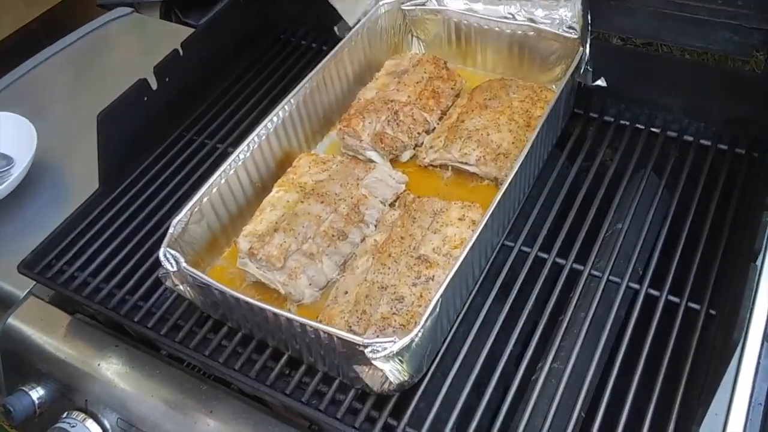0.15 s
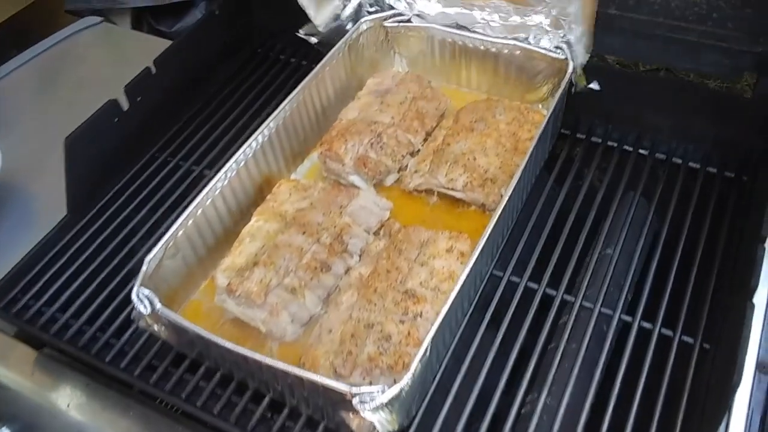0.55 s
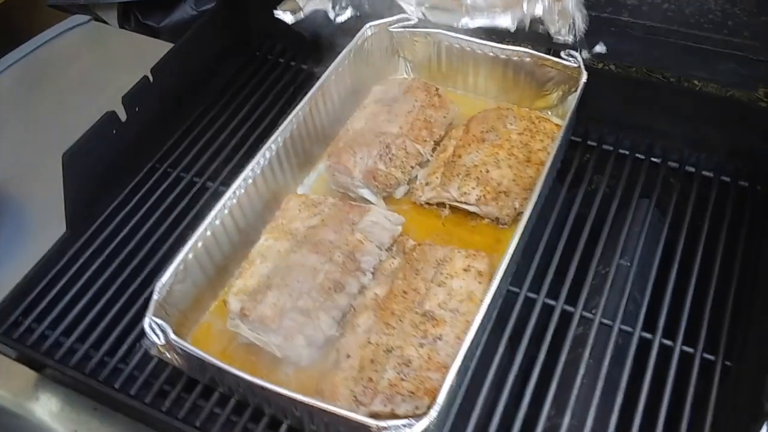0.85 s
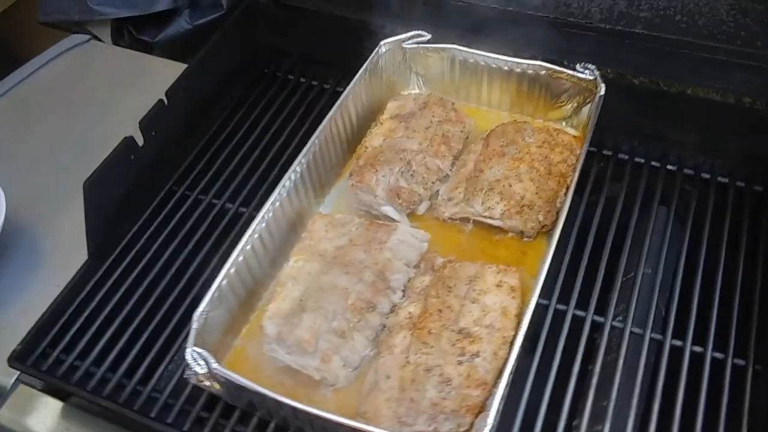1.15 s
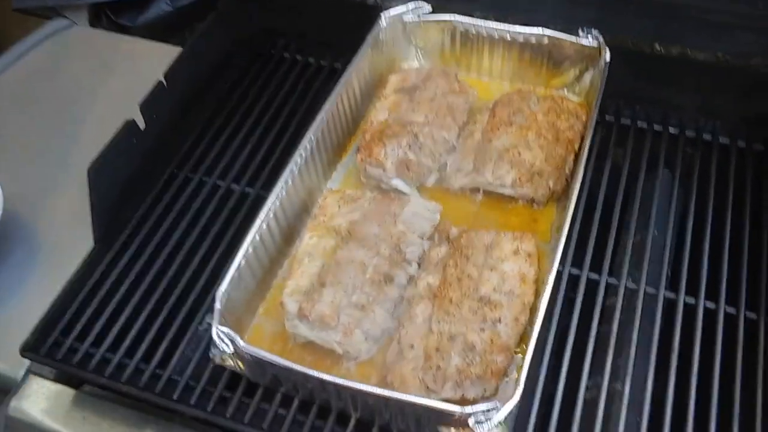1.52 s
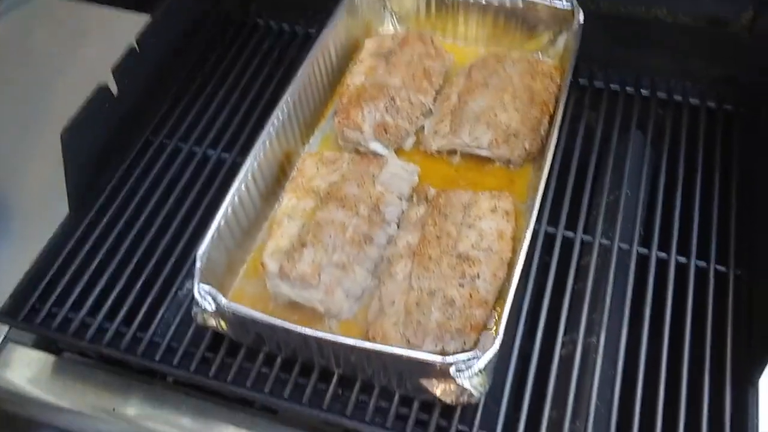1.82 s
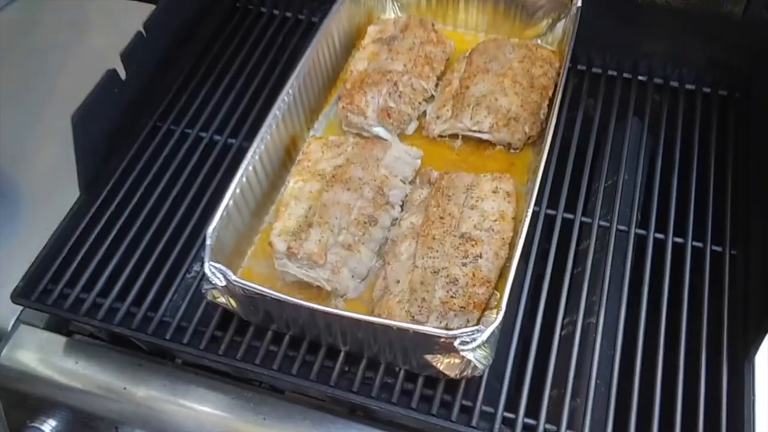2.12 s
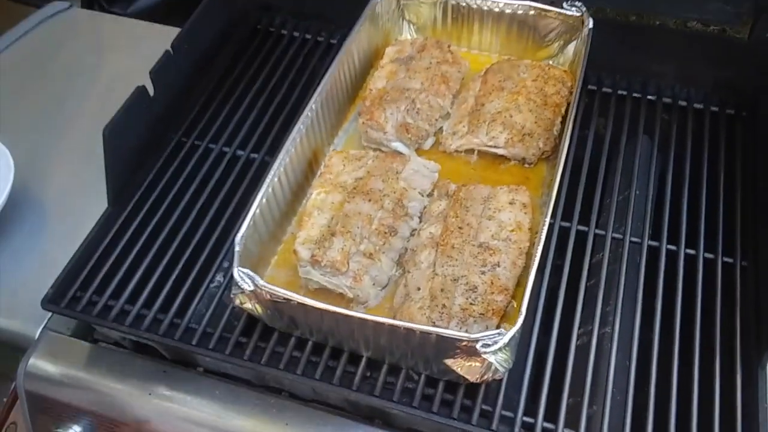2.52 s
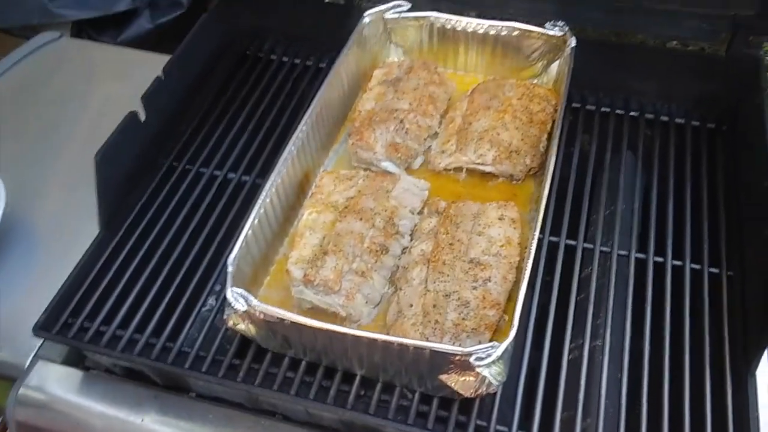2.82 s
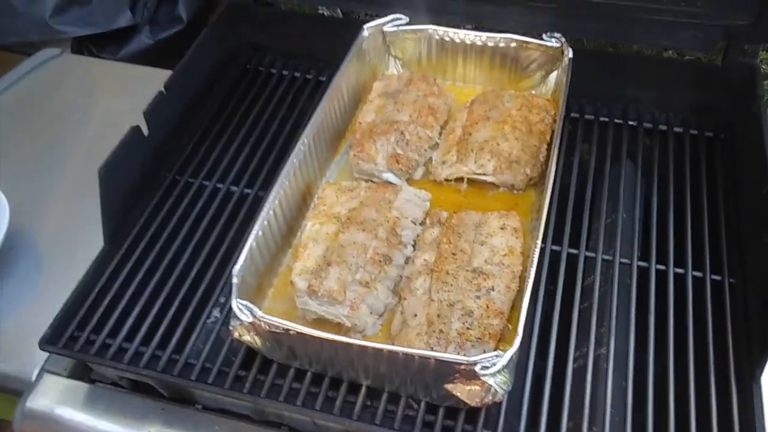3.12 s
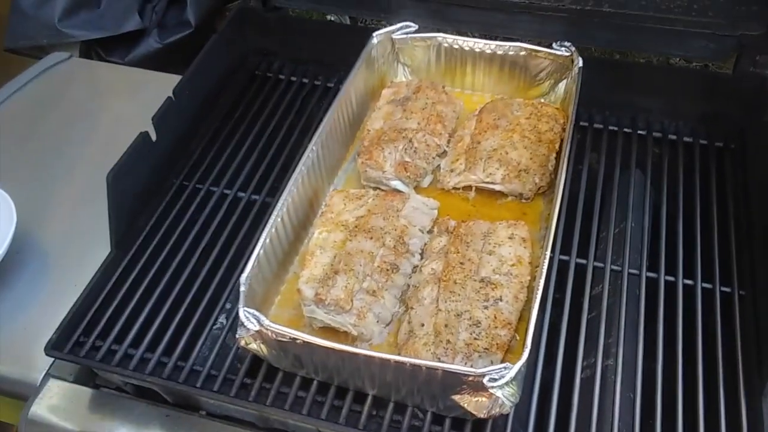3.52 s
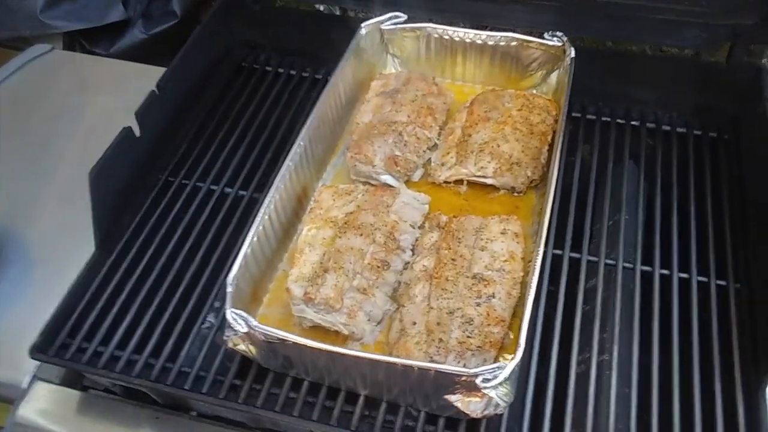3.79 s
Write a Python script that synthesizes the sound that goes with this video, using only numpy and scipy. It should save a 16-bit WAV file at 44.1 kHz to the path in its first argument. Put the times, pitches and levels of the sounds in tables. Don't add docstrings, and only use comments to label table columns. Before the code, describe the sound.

Aluminium foil is tugged and crumpled off a hollow foil tray, very close to a small microphone outdoors; after one second only faint insect hiss, small bird chirps and slight foil rustles remain, with another crinkle at the end.

```python
import sys
import numpy as np
from scipy import signal
from scipy.fft import rfft, irfft, next_fast_len
from scipy.io import wavfile
from scipy.ndimage import uniform_filter1d

SR = 44100
rng = np.random.default_rng(int(sys.argv[2]) if len(sys.argv) > 2 else 0)


def master(y):
    cut = np.clip(np.atleast_2d(y).T, -1, 1)
    pcm = np.round(cut * 32767)
    wavfile.write(sys.argv[1], SR, pcm.astype(np.int16))


def ratio_of_db(decibels):
    return 10 ** (np.asarray(decibels, float) / 20)


N = 174195

# pitch_hz, level_db (per Hz)
TOWN_SPECTRUM = [(30, -12), (55, -2.5), (280, -6), (600, -17), (850, -13), (1150, -19), (2200, -28.5),
                 (3400, -35.5)]
# pitch_hz, level_db (per Hz)
AIR_SPECTRUM = [(2000, -20), (7000, 3.5), (11000, -13), (15500, -20)]
# start_s, level_db, nearest_singers_lift_db, highest_singers_lift_db
CHORUS_SWELL = [(0.0, -29, -5, 0), (.09, -31.5, -3, 2), (0.22, -41, 1, 8), (0.77, -26.5, -15, 0),
                (1.11, -37.5, 1, 0), (1.25, -41.5, -3, -3), (1.42, -44, -1.5, 1.5), (1.7, -39.5, -1.5, 1),
                (1.95, -45, 0, -2.5), (2.15, -41.5, 1, 0.5), (2.34, -38, -4, 0.5), (2.69, -40, 1.5, -2),
                (3.0, -38, 1, 4), (3.3, -37.5, 5, 1), (3.45, -36.5, 3, -6), (3.6, -36, 8.5, -1),
                (3.75, -35, 5, 1.5), (3.95, -36.5, 3.5, 2)]
# pitch_hz, width_hz, level_db
WING_RESONANCES = [(4340, 1530, -7.5), (6520, 2620, -0.5), (8840, 4400, -11.5), (5815, 1700, -1.5)]
# start_s, length_s, start_hz, end_hz, level_db
BIRD_NOTES = [(0.998, .014, 2580, 2540, -43), (0.0, .09, 4350, 4300, -40), (1.13, .035, 2650, 2600, -50),
              (1.04, 0.014, 2550, 2600, -43), (1.213, .03, 2490, 2530, -51),
              (1.433, 0.027, 2750, 2630, -49), (1.47, 0.027, 2680, 2580, -59), (1.56, .03, 2780, 2490, -48),
              (1.44, 0.15, 3350, 3420, -55), (1.51, 0.032, 2700, 2600, -54), (1.355, .03, 2970, 2900, -50),
              (1.9, 0.27, 2650, 2550, -66), (2.77, 0.05, 3450, 3476, -56), (2.64, 0.058, 3900, 3850, -49),
              (2.85, .05, 2850, 2880, -67), (2.222, .025, 4550, 4440, -46), (2.252, .03, 4050, 4300, -48),
              (2.278, 0.036, 4500, 4730, -44.5), (2.66, 0.05, 2420, 2380, -58),
              (2.922, 0.02, 2860, 2640, -49), (3.107, 0.017, 3300, 3150, -57),
              (3.127, 0.024, 3000, 2970, -46), (3.205, 0.061, 2350, 2180, -56),
              (3.0, 0.42, 1316, 1280, -59.5), (3.46, .045, 3000, 3000, -46), (3.51, .05, 2980, 2970, -54),
              (3.59, .1, 2450, 2360, -49), (3.772, 0.028, 1167, 1216, -37.5)]
# start_s, length_s, start_hz, end_hz, level_db
SCOLD_NOTES = [
    (1.73, 0.042, 3620, 3320, -37.5),
    (1.742, 0.0293, 3780, 4270, -37.5),
    (1.76, 0.048, 3110, 3070, -36.5),
    (1.788, 0.03, 2750, 2610, -47),
    (2.14, 0.068, 2390, 2500, -62),
    (2.88, .08, 1780, 1740, -61),
    (1.85, 0.056, 3120, 3010, -49),
]
# start_s, rise_s, hold_s, level_db, release_db_per_s
SHEET_FLUTTERS = [
    (1.0, .03, 0.081, -44.5, 64),
    (1.296, 0.018, 0.041, -51.5, 40),
    (1.588, 0.027, .05, -44.5, 123),
    (1.71, 0.025, 0.11, -47.5, 66),
    (2.201, .006, 0.055, -43.5, 112),
    (2.898, 0.04, .05, -55.5, 80),
    (3.4, .08, .03, -58, 60),
    (3.525, .006, 0.071, -44, 110),
    (3.62, .02, .05, -51, 100),
    (3.771, .003, 0.047, -46.5, 150),
]
# pitch_hz, level_db
FLUTTER_SPECTRUM = [(250, -14), (600, -2), (1000, 3.5), (1600, -1.5), (2600, 1.5), (4300, -0.5), (7000, -5),
                    (12000, -30)]
# start_s, peak_db
TRAY_POPS = [(0.136, -27), (0.213, -24.5), (0.269, -19), (0.32, -22), (0.364, -31), (0.404, -20),
             (0.463, -23.5), (0.547, -22), (0.573, -29.5), (0.666, -25.5), (0.689, -32)]
# pitch_hz, level_db, t60_s
TRAY_MODES = [(398, -6.5, 0.043), (733, -4, 0.075), (855, -4.5, 0.081)]
# start_s, level_db
MIC_BUMPS = [
    (.2875, -24),
    (1.91, -40),
    (1.57, -44),
]
# start_s, rise_s, hold_s, crease_level_db, sheet_rustle_relative_db
FOIL_TUGS = [(-.03, 0.011, 0.02, -34.5, -3), (0.099, 0.022, .012, -34, 1), (0.128, 0.012, .01, -28.5, -0.5),
             (0.189, 0.011, 0.029, -24, -6), (0.24, 0.011, 0.015, -30.5, 1),
             (0.269, 0.038, 0.03, -28.5, -1), (0.329, 0.006, 0.012, -21, -9.5),
             (0.342, .008, 0.022, -22, -13.5), (0.381, 0.0095, 0.019, -26, -0.5),
             (0.4, 0.015, 0.029, -17.5, -10), (0.451, 0.0077, 0.025, -26, -8.5),
             (0.493, .01, 0.032, -28, -0.5), (0.538, 0.006, 0.019, -23.5, -6),
             (0.551, .012, 0.052, -20, -11.5), (0.645, 0.02, 0.033, -30.5, 0.5),
             (0.697, .015, 0.037, -29.5, -2.5), (0.763, 0.006, 0.025, -27.5, -4.5),
             (0.786, .012, 0.038, -26, -7), (0.85, 0.0033, 0.008, -23, -3.5),
             (0.86, .004, 0.011, -25, -6.5), (0.9, .01, 0.041, -34.5, -7),
             (0.944, 0.0037, 0.012, -37.5, 1.5), (1.3162, .001, .018, -41, -7),
             (1.6168, .003, .016, -37.5, -12), (1.637, .004, 0.0074, -43, 0.5),
             (2.205, .003, .008, -57, -3), (3.769, .003, 0.02, -48, 1), (3.82, 0.004, 0.012, -38, 1.5),
             (3.862, 0.0026, 0.013, -40.5, 0.5), (3.876, .01, 0.088, -34.5, -5.5)]
# start_s, peak_db
FOLD_SNAPS = [(0.1231, -17.5), (0.207, -13), (0.3386, -6), (0.41, -5), (0.5396, -12), (0.5694, -7),
              (0.7634, -15), (0.853, -11), (0.8634, -8), (0.9504, -20), (1.317, -28), (1.62, -25),
              (1.6255, -16), (1.6484, -30), (3.8254, -24), (3.837, -23), (3.8604, -22), (3.894, -18)]
# pitch_hz, level_db
CREASE_SPECTRUM = [(1500, -32), (3500, -6.5), (5200, -3.5), (7500, -2), (9400, -1.5), (11000, -7),
                   (13000, -16), (15700, -19)]
# pitch_hz, level_db
SHEET_SPECTRUM = [(80, -36), (200, -9), (400, -3), (750, -6.5), (1500, 1), (3000, 1.5), (6000, -1),
                  (12000, -49)]
# pitch_hz, t60_s
SHEET_RING = [(300, 0.18), (1500, 0.28), (5000, 0.33), (9000, 0.22), (15000, 0.038)]
# pitch_hz, width_hz, level_db
TRAY_AIR = [(385, 86, -1), (698, 154, 3.5), (923, 217, 1.5)]
# pitch_hz, width_hz, level_db
HOUSING_DIPS = [(552, 112, -2.5), (1206, 100, -6), (8470, 230, -5.5)]


def unit(x):
    return x / np.sqrt(np.mean(x ** 2))


def read(table, hz):
    table_hz, value = np.array(table).T[:2]
    return np.interp(np.log(hz + 1), np.log(table_hz), value)


def shape(x, db_of):
    n = next_fast_len(len(x) + 2048)
    hz = np.arange(n // 2 + 1) * SR / n
    return irfft(rfft(x, n) * ratio_of_db(db_of(hz)), n)[:len(x)]


def band(x, hz, width_hz):
    return shape(x, lambda f: -40 * np.log10(1 + ((f - hz) / (width_hz / 2)) ** 2))


def walk(rate_hz):
    k = max(int(SR / rate_hz), 2)
    steps = np.repeat(rng.standard_normal(N // 100), k)[:N]
    return unit(uniform_filter1d(uniform_filter1d(steps, k), k))


def swarm(clicks_per_s, scatter_db):
    hit, size, sign = rng.random((3, N))
    return unit((hit < clicks_per_s / SR) * ratio_of_db(-scatter_db * np.log(size + 0.0033)) * np.sign(sign - 0.5))


def convolve(x, h):
    return signal.fftconvolve(x, h)[:N]


def town():
    rumble = 0
    for hz in 40 * 2 ** np.arange(0, 6.6, 0.7):
        flicker_db = (2 if hz > 900 else 1) * walk(3) + walk(20)
        rumble = rumble + band(rng.standard_normal(N), hz, hz / 1.5) * ratio_of_db(flicker_db)
    rumble = unit(shape(rumble, lambda f: read(TOWN_SPECTRUM, f))) * ratio_of_db(-51)
    fan = unit(band(rng.standard_normal(N), 920, 220)) * ratio_of_db(-62 + 2 * walk(4))
    air = unit(shape(rng.standard_normal(N), lambda f: read(AIR_SPECTRUM, f))) * ratio_of_db(-56)
    return rumble + air + fan


def chorus(t):
    start_s, level_db, near_db, high_db = np.array(CHORUS_SWELL).T
    wings = []
    for hz, width_hz, db in WING_RESONANCES:
        wander_db = walk(7.4) + 1.18 * walk(90)
        wings.append(unit(band(swarm(9000, 2.0), hz, width_hz)) * ratio_of_db(db + wander_db))
    high = wings[2] * ratio_of_db(np.interp(t, start_s, high_db))
    near = wings[3] * ratio_of_db(np.interp(t, start_s, near_db))
    return (wings[0] + wings[1] + high + near) * ratio_of_db(np.interp(t, start_s, level_db) - 4.0)


def sing(t, notes, warble, roughness, wander, rasp):
    out = np.zeros(N)
    for start_s, length_s, from_hz, to_hz, db in notes:
        a = slice(int(start_s * SR), int((start_s + length_s) * SR))
        u = np.clip((t[a] - start_s) / length_s, 0, 1)
        hz = (from_hz + (to_hz - from_hz) * u) * (1 + warble * wander[a])
        swell = np.sin(np.pi * u).clip(0) ** 0.5
        out[a] += ratio_of_db(db) * (1 + roughness * rasp[a]) * swell * np.sin(2 * np.pi * np.cumsum(hz) / SR)
    return out


def birds(t):
    twitter = []
    for when, drop, pitch, loud in rng.random((70, 4)):
        hz = 1500 + 2200 * pitch
        twitter.append((3.9 * when, 0.021 + 0.069 * drop, hz, hz * (1 - 0.053 * drop), -72 + 6 * loud))
    wander = walk(200)
    out = sing(t, BIRD_NOTES + twitter, 0.02, 0.25, wander, walk(70))
    out = out + sing(t, SCOLD_NOTES, 0.03, 0.5, wander, walk(400))
    u = t[:SR // 2]
    echo = rng.standard_normal(len(u)) * ratio_of_db(-60 * u / 0.45)
    return out + ratio_of_db(-5) * convolve(out, echo / np.sqrt(np.sum(echo ** 2)))


def flutter(t):
    power = 0
    for start_s, rise_s, hold_s, db, release_db_s in SHEET_FLUTTERS:
        after = np.maximum(t - start_s - rise_s - hold_s, 0)
        power = power + np.clip((t - start_s) / rise_s, 0, 1) ** 2 * ratio_of_db(db - release_db_s * after) ** 2
    rustle = unit(shape(swarm(7000, 0.99), lambda f: read(FLUTTER_SPECTRUM, f)))
    return np.sqrt(power) * rustle * ratio_of_db(walk(24.88))


def tray(t):
    attack_s = 0.00047
    out = np.zeros(N)
    for start_s, peak_db in TRAY_POPS:
        a = slice(int(start_s * SR), int(start_s * SR) + 8192)
        u = np.maximum(t[a] - start_s, 0)
        for hz, mode_db, t60_s in TRAY_MODES:
            level_chance, pitch_chance = rng.standard_normal(2)
            decay = ratio_of_db(peak_db + mode_db + 2 * level_chance - 60 * u / t60_s)
            mode_hz = hz * (1 + 0.042 * pitch_chance)
            out[a] += decay * (1 - np.exp(-u / attack_s)) * np.sin(2 * np.pi * mode_hz * u)
    return out


def bumps(t):
    width_s, thud_hz, thud_t60_s = 0.00099, 65.6, 0.094
    out = np.zeros(N)
    for start_s, db in MIC_BUMPS:
        u = np.maximum(t - start_s, 0)
        thud = 0.52 * ratio_of_db(-60 * u / thud_t60_s) * np.sin(2 * np.pi * thud_hz * u)
        out += ratio_of_db(db) * (thud - np.exp(-((t - start_s) / width_s) ** 2))
    return out


def ringing(u):
    ring = 0
    for hz in 150 * 2 ** np.arange(0, 7, 0.5):
        t60_s = read(SHEET_RING, hz)
        ring = ring + np.sqrt(1 / t60_s) * band(rng.standard_normal(len(u)), hz, hz / 2) * ratio_of_db(-60 * u / t60_s)
    return ring / np.sqrt(np.sum(ring ** 2)) * ratio_of_db(-4)


def tug_power(t):
    body_db_s, top_db_s, sheet_db_s, fold_db_s = 350, 594, 131, 1800
    settle_db, settle_db_s = -12.5, 83
    crack_db, crack_s = 0, 0.019
    sheet_lag_s = 0.0031
    power = np.zeros((3, N))
    for start_s, rise_s, hold_s, db, rustle_db in FOIL_TUGS:
        a = slice(int(max(start_s, 0) * SR), int((start_s + hold_s + 0.6) * SR))
        u = t[a] - start_s
        after = np.maximum(u - rise_s - hold_s, 0)
        top_after = np.maximum(u - rise_s - hold_s / 2, 0)
        crack = ratio_of_db(crack_db * np.exp(-np.abs(u - rise_s) / crack_s - rise_s / 0.01)) ** 2
        up = np.clip(u / max(rise_s, 1e-3), 0, 1) ** 2 * crack
        late = np.clip(u / (rise_s + sheet_lag_s), 0, 1) ** 2
        settling = ratio_of_db(db + settle_db - settle_db_s * after) ** 2
        power[0, a] += up * (ratio_of_db(db - body_db_s * after) ** 2 + settling)
        power[1, a] += up * ratio_of_db(db - top_db_s * top_after) ** 2
        power[2, a] += late * ratio_of_db(db + rustle_db - sheet_db_s * after) ** 2
    for start_s, peak_db in FOLD_SNAPS:
        a = slice(int(start_s * SR) - 44, int(start_s * SR) + 2000)
        power[:2, a] += ratio_of_db(peak_db - 14 - fold_db_s * (t[a] - t[a][0])) ** 2
    return power


def crease_db(hz):
    return read(CREASE_SPECTRUM, hz) + 4 * np.exp(-((hz - 9450) / 550) ** 2)


def foil(t):
    top_hz = 12000
    snaps = unit(shape(swarm(4100, 0), crease_db)) * ratio_of_db(0.8 * walk(150))
    top = shape(snaps, lambda f: -10 * np.log10(1 + (top_hz / (f + 1)) ** 8))
    body = shape(snaps, lambda f: -10 * np.log10(1 + (f / top_hz) ** 8))
    rustle = unit(shape(swarm(2500, 3), lambda f: read(SHEET_SPECTRUM, f))) * ratio_of_db(walk(60))
    body, top, rustle = np.sqrt(tug_power(t)) * [body, top, rustle]
    hollow = ratio_of_db(4) * sum(band(rustle, hz, width_hz) * ratio_of_db(db) for hz, width_hz, db in TRAY_AIR)
    direct = body + top + rustle
    patch = np.repeat(rng.integers(0, 5, N // 128 + 1), 128)[:N]
    rung = 0
    for k in range(5):
        fade = np.sqrt(uniform_filter1d(1.0 * (patch == k), size=64).clip(0))
        rung = rung + convolve(direct * fade, ringing(t[:SR // 5]))
    return body + top + hollow + ratio_of_db(-3) * rustle + rung


def scene():
    t = np.arange(N) / SR
    return (town() + chorus(t) + birds(t) + flutter(t) + tray(t) + bumps(t) + foil(t))[None]


def band_limit(x):
    return signal.sosfilt(signal.butter(12, 15710, fs=SR, output="sos"), x)


def record(dry):
    limit, bass_cut_hz, treble_cut_hz = 0.8, 30, 15700
    mic = shape(dry[0], lambda f: sum(db * np.exp(-((f - hz) / w) ** 2) for hz, w, db in HOUSING_DIPS))
    mic = limit * np.tanh(mic / limit)
    mic = shape(mic, lambda f: -10 * np.log10(1 + (bass_cut_hz / (f + 1)) ** 6) - 80 * (f > treble_cut_hz))
    return band_limit(mic[None])


dry = scene()
out = record(dry)
master(out)
```